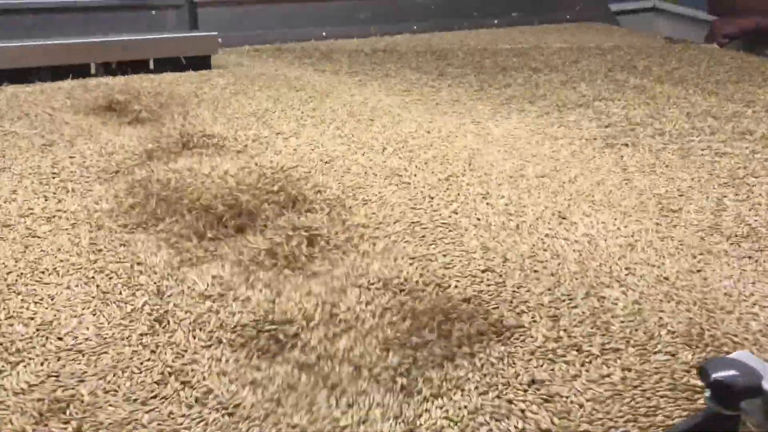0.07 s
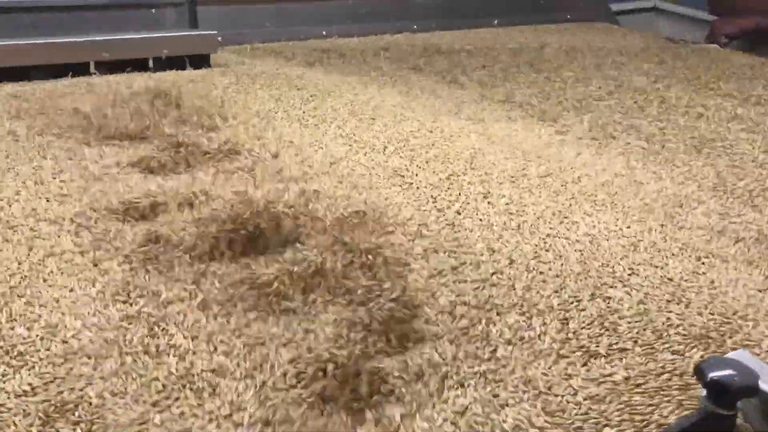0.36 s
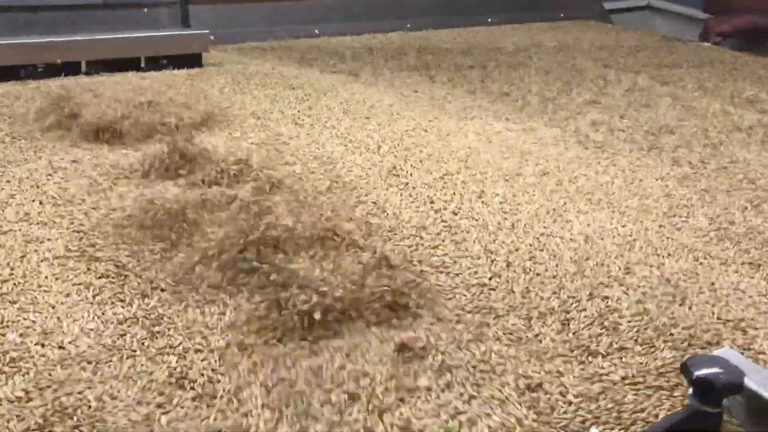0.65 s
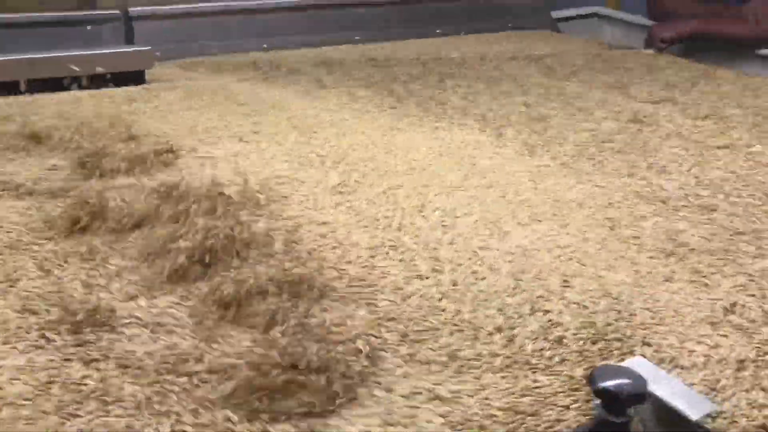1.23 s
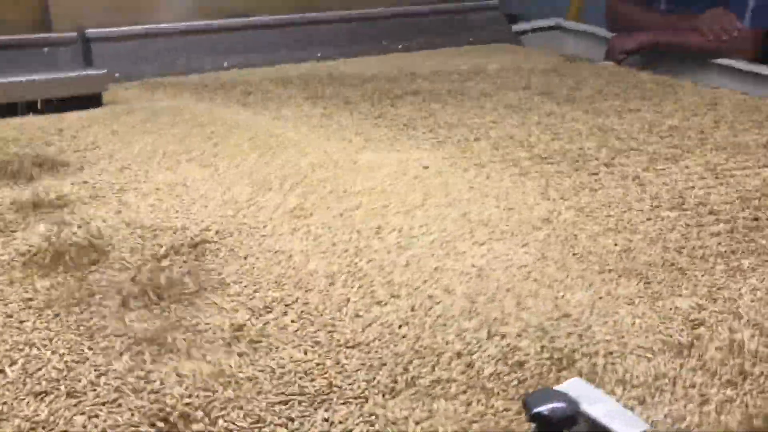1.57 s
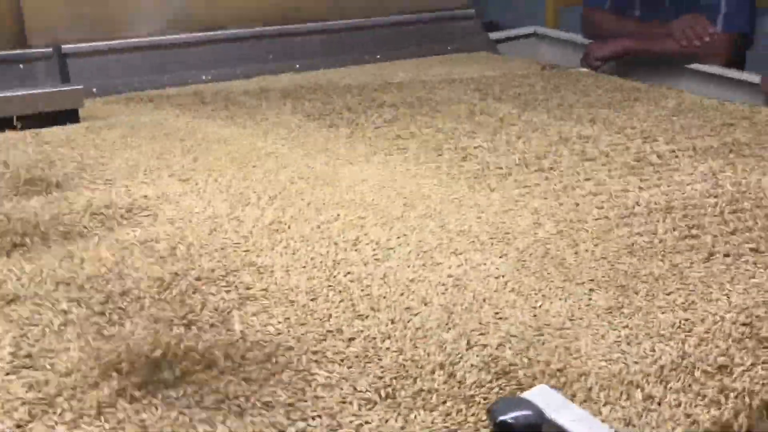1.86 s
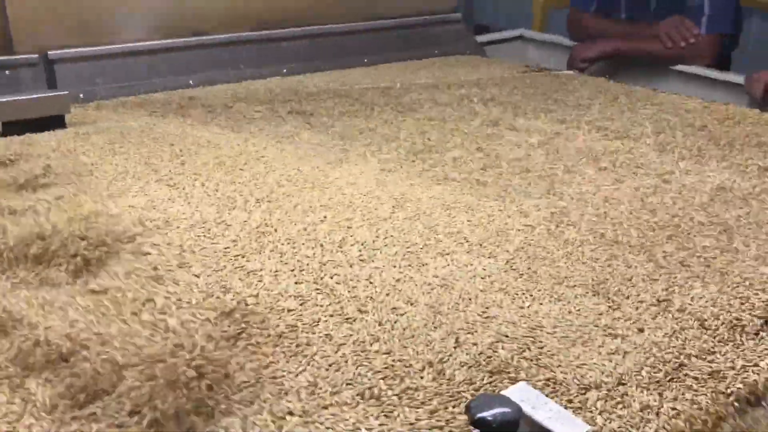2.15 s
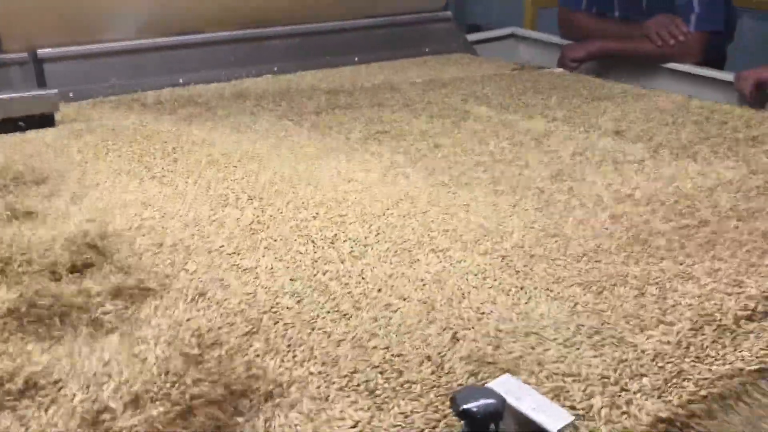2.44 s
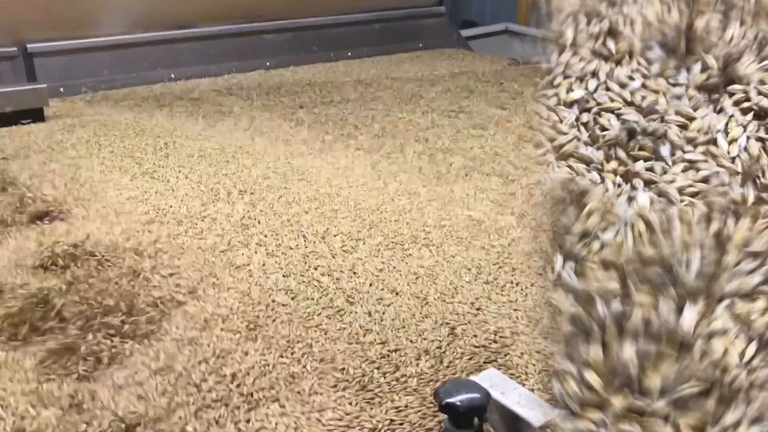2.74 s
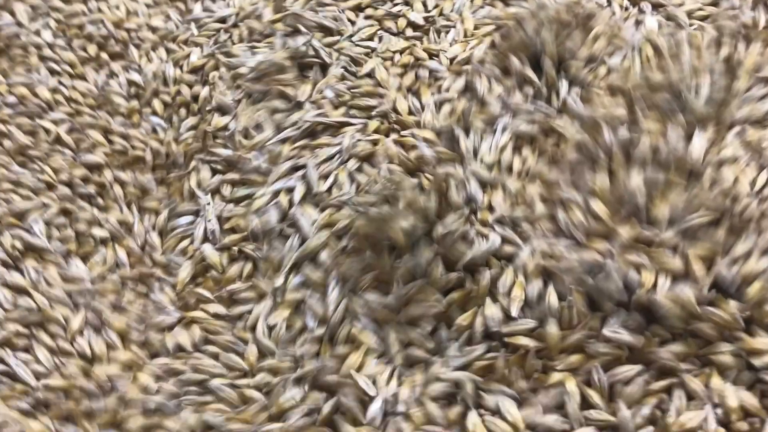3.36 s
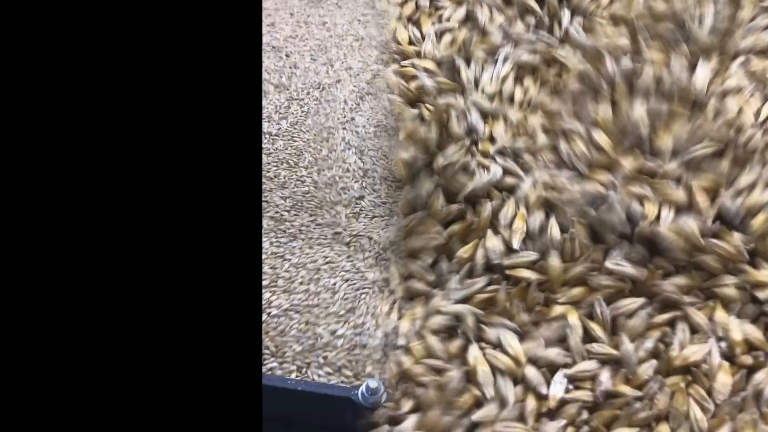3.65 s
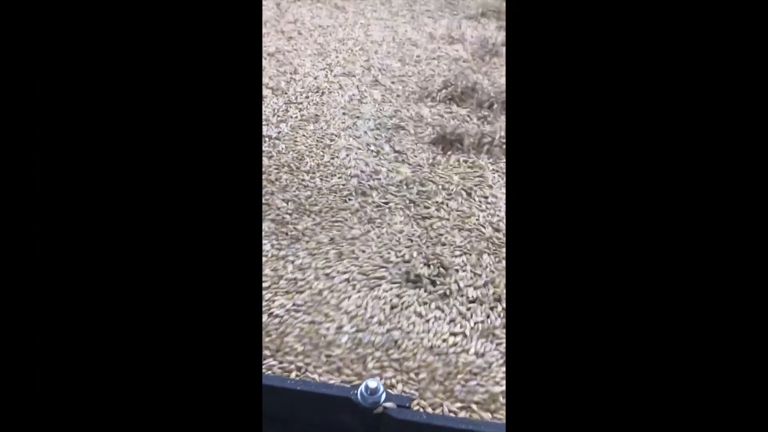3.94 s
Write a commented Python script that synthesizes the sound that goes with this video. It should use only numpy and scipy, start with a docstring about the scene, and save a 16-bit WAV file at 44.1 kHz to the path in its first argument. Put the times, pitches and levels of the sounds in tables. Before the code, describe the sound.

Grain hisses and patters on a shaking separator table indoors, over a low air roar and fan hum, with faint pings and thin squeaks. Everything fades to silence, then quickly returns.

```python
"""Grain hisses and patters over a low roar of air and a fan hum: a gravity separating table, indoors.
The fan blows air up through a shaking deck; the kernels drum and rub, surging twice a stroke.
The deck gives thin squeaks and a loose metal part pings faintly.
The whole sound fades to silence and quickly comes back."""
import sys
import numpy as np
from scipy import signal
from scipy.fft import rfft, irfft
from scipy.io import wavfile

SR = 44100
rng = np.random.default_rng(int(sys.argv[2]) if len(sys.argv) > 2 else 0)


def wrap_up_sound(samples):
    """Save the sound to the file named by the first command line argument, as 16-bit audio."""
    columns = np.atleast_2d(samples).T
    # keep every value between -1 and 1, then stretch to whole-number steps
    tamed = np.clip(columns, -1, 1)
    steps = np.round(tamed * 32767).astype(np.int16)
    wavfile.write(sys.argv[1], SR, steps)


N = 176400

# air through the deck: (frequency [Hz], relative density [dB])
AIR_SPECTRUM = [(22, -34.5), (30, -22.5), (42, -11.2), (55, 1), (75, -4.5), (92, -4.5), (122, -4.5),
                (165, -9.5), (195, -6), (220, -1.5), (285, -2.5), (320, -10), (400, -13.5), (480, -19)]
# fan and drive tones: (frequency [Hz], level [dB], line width [Hz])
DRIVE_TONES = [(256, -34.5, 12), (416.7, -49.5, 11), (688, -49.5, 40), (1015, -50, 9.2)]
# loose metal part: (time [s], level [dB])
PING_EVENTS = [(.27, -39), (.75, -37), (1.17, -37), (1.31, -43), (2.09, -36), (2.38, -46), (2.67, -36),
               (2.83, -33.5), (2.99, -32.5), (3.135, -35), (3.29, -33.5)]
# deck squeaks: (time [s], level [dB])
SQUEAK_EVENTS = [(.14, -35), (.356, -38), (.884, -35), (1.335, -35), (1.627, -35), (2.07, -34),
                 (2.224, -33), (2.521, -31), (2.675, -37), (2.96, -32.5), (3.117, -38), (3.417, -33)]
# grain surges: (phase [strokes], width [strokes], height [dB])
STROKE_SURGES = [(.42, .14, 2.05), (0.801, 0.14, 2.5)]
# moving grain: (frequency [Hz], gain [dB])
GRAIN_SPECTRUM = [(400, -1.5), (490, -11), (550, -3.5), (670, -4), (760, -6.5), (1050, -7.5), (1400, -10),
                  (2000, -13), (3000, -14), (3700, -14.5), (4400, -16), (4930, -19.5), (5400, -17),
                  (5800, -15.5), (7200, -16), (7700, -17.5), (8300, -15.5), (9000, -15), (10000, -15.9),
                  (10450, -18), (10900, -13), (11700, -11.5), (12300, -13.5), (13000, -10.5), (13700, -19),
                  (15500, -16.5)]
# kernel contacts, patter to sizzle: (frequency [Hz], rate [1/s], surge share [ratio], flutter [dB])
KERNEL_CONTACTS = [(517, 6000, 0.11, 1.03), (1540, 7000, 0.17, 0), (4020, 10000, 0.36, -1.38),
                   (9000, 13000, 1.2, 0.46), (12500, 11000, 1.4, 0.75)]
# contact bands: (edge [Hz])
BAND_EDGES_HZ = [200, 800, 1500, 2600, 4000, 6000, 8000, 10500, 13500, 17000]
# fine sizzle: (time [s], gain [dB])
SIZZLE_ENVELOPE = [(0, -2), (1.05, -1.5), (1.4, -3), (2.7, -2.5), (4, -2)]

STROKE_HZ, STROKE_START_S, STROKE_RESTART_S = 6.68, 0.0011, 3.805
FADE_OUT_S, SILENT_FROM_S, SILENT_TO_S, FULL_AGAIN_S = 2.485, 3.483, 3.609, 3.89
TIME_S = np.arange(N) / SR
BIN_HZ = np.arange(N // 2 + 1) * SR / N


def from_db(db):
    """Decibels to gain."""
    return 10 ** (np.asarray(db) / 20)


def unit_rms(x):
    """Scale to rms 1."""
    return x / np.sqrt(np.mean(x ** 2) + 1e-20)


def colour(x, spectrum, skirt_db_per_octave=90):
    """Shape by a spectrum, falling steeply beyond its ends; rms 1."""
    hz, db = np.transpose(spectrum)
    octave, knots = np.log2(np.maximum(BIN_HZ, 1)), np.log2(hz)
    octaves_beyond = np.abs(octave - np.clip(octave, knots.min(), knots.max()))
    gain = from_db(np.interp(octave, knots, db) - skirt_db_per_octave * octaves_beyond)
    return unit_rms(irfft(rfft(x) * gain, N))


def band(x, low_hz, high_hz):
    """Brick-wall band-pass."""
    return irfft(rfft(x) * ((BIN_HZ >= low_hz) & (BIN_HZ < high_hz)), N)


def narrow_noise(hz, width_hz):
    """Noise twice through one resonance; full width at -6 dB; rms 1."""
    response = 1 / (1 + ((BIN_HZ - hz) / (width_hz / 2)) ** 2)
    return unit_rms(irfft(rfft(rng.standard_normal(N)) * response, N))


def drift(rate_hz):
    """Slow random wander; rms 1."""
    return narrow_noise(0, 2 * rate_hz)


def reflections(x, count=30, level_db=-25.5, span_s=.025):
    """Nearby steel walls scatter short, dying echoes; rms preserved."""
    out = x.copy()
    for lag_s, sign in zip(rng.uniform(.002, span_s, count), rng.choice([-1, 1], count)):
        gain = sign * from_db(level_db) * np.exp(-lag_s / span_s)
        out += gain * np.roll(x, int(lag_s * SR))
    return out * np.std(x) / np.std(out)


def deck_strokes():
    """Deck phase in strokes; reset during the silence."""
    origin_s = np.where(TIME_S < SILENT_TO_S, STROKE_START_S, STROKE_RESTART_S)
    return STROKE_HZ * (TIME_S - origin_s)


def fan(blade_hz=104.95, level_db=-30.5, waver_db=1):
    """Wavering blade hum plus the rough tones of the drive."""
    phase_rad = 2 * np.pi * (blade_hz * TIME_S + rng.random()) + 0.46 * drift(2.5)
    hum = np.sqrt(2) * np.sin(phase_rad) * from_db(level_db - waver_db * drift(1.3))
    drive = sum(from_db(db) * narrow_noise(hz, width_hz) for hz, db, width_hz in DRIVE_TONES)
    return hum + drive


def air(strokes, level_db=-21, throb_db=0.9, flutter_db=0.67):
    """Low roar through the deck, throbbing with its judder four times a stroke."""
    roar = colour(rng.standard_normal(N), AIR_SPECTRUM)
    judder = np.cos(2 * np.pi * 4 * (strokes - .12))
    return roar * from_db(level_db + throb_db * judder + flutter_db * drift(28))


def rubs(events, hz, width_hz, sigma_s=.011):
    """Brief rubs excite one resonance: Gaussian bursts of narrow noise."""
    envelope = sum(from_db(db) * np.exp(-.5 * ((TIME_S - at_s) / sigma_s) ** 2) for at_s, db in events)
    return envelope * narrow_noise(hz, width_hz)


def metal_pings():
    """A loose metal part sounds its narrow resonance."""
    return rubs(PING_EVENTS, hz=991, width_hz=18)


def deck_squeaks():
    """The swinging deck rubs, thin and high."""
    return rubs(SQUEAK_EVENTS, hz=11950, width_hz=350)


def surge_db(strokes):
    """Grain activity: two humps a stroke, zero mean."""
    db = 0
    for phase, width, height_db in STROKE_SURGES:
        offset = (strokes - phase + .5) % 1 - .5
        db += height_db * np.exp(-.5 * (offset / width) ** 2)
    return db - db.mean()


def kernel_ticks(low_hz=800, high_hz=14000, t60_s=0.028, count=1600):
    """Single kernels ring briefly; random time, pitch and size; rms 1."""
    age_s = np.arange(SR // 20) / SR
    decay = np.exp(-np.log(1000) * age_s / t60_s)
    out = np.zeros(N + len(age_s))
    for when, pitch, size in rng.random((count, 3)):
        hz = low_hz + pitch * (high_hz - low_hz)
        start = int(when * N)
        out[start:start + len(age_s)] += size ** 2 * np.sin(2 * np.pi * hz * age_s) * decay
    return unit_rms(out[:N])


def kernel_contacts(rate_per_s, spread_db=0.5):
    """Dense tiny clicks of uneven size and sign; rms 1."""
    hits = rng.random(N) < rate_per_s / SR
    sizes = from_db(spread_db * np.minimum(rng.exponential(1, N), 4))
    return unit_rms(hits * sizes * rng.choice([-1, 1], N))


def grain(strokes, level_db=-26, tick_gain_db=-16, wander_db=0.47, flutter_hz=22, sizzle_above_hz=10000):
    """Kernels drum and rub in every band; the finest contacts follow the stroke most."""
    flow_db = surge_db(strokes) + wander_db * drift(7.5)
    sizzle_db = np.interp(TIME_S, *np.transpose(SIZZLE_ENVELOPE))
    hz, *columns = np.transpose(KERNEL_CONTACTS)
    kernels = from_db(tick_gain_db + flow_db) * kernel_ticks()
    for low_hz, high_hz in zip(BAND_EDGES_HZ, BAND_EDGES_HZ[1:]):
        log_centre = np.log(low_hz * high_hz) / 2
        rate_per_s, share, flutter_db = (np.interp(log_centre, np.log(hz), col) for col in columns)
        gain_db = share * flow_db + flutter_db * drift(flutter_hz)
        if low_hz > sizzle_above_hz:
            gain_db += sizzle_db
        kernels += from_db(gain_db) * band(kernel_contacts(rate_per_s), low_hz, high_hz)
    return from_db(level_db) * colour(kernels, GRAIN_SPECTRUM)


def scene():
    """The whole machine, centred."""
    strokes = deck_strokes()
    machine = deck_squeaks() + metal_pings() + air(strokes) + fan() + reflections(grain(strokes))
    return np.array([machine, machine])


def record(dry, hiss_db=-96, cutoff_hz=15750):
    """S-shaped fade out and back in over a trace of hiss; steep low-pass."""
    fader = np.interp(TIME_S, [FADE_OUT_S, SILENT_FROM_S, SILENT_TO_S, FULL_AGAIN_S], [1, 0, 0, 1])
    faded = dry * np.sin(np.pi / 2 * fader) ** 2
    hiss = from_db(hiss_db) * rng.standard_normal(N)
    lowpass = signal.ellip(12, .2, 90, cutoff_hz, fs=SR, output="sos")
    return signal.sosfilt(lowpass, faded + hiss)


dry = scene()
out = record(dry)
wrap_up_sound(out)
```